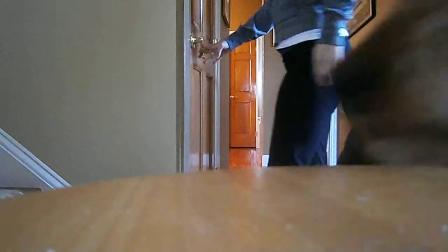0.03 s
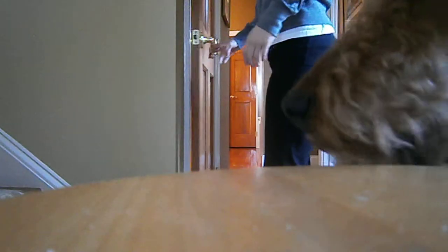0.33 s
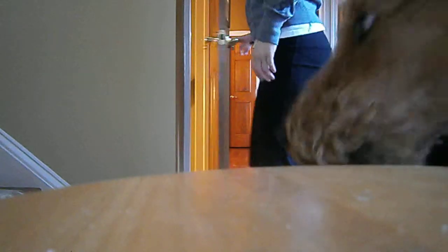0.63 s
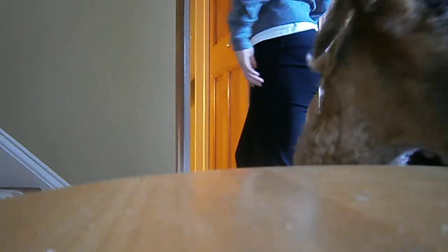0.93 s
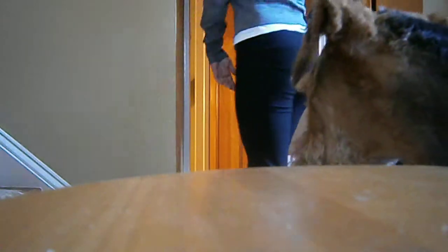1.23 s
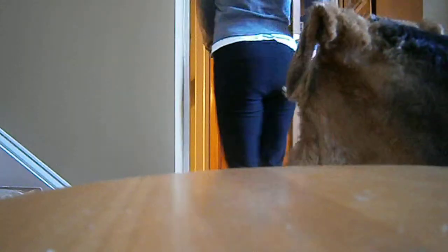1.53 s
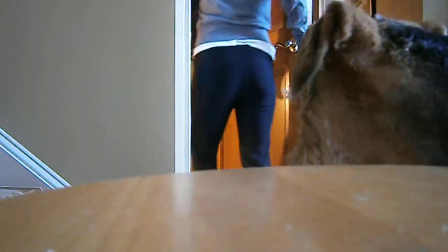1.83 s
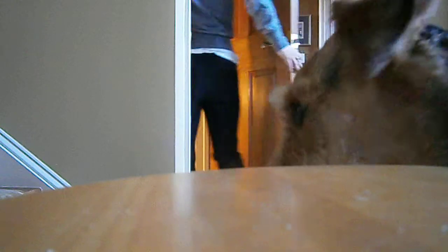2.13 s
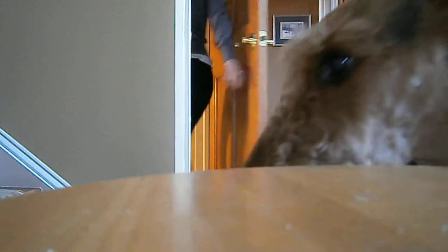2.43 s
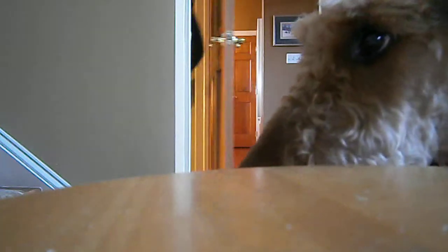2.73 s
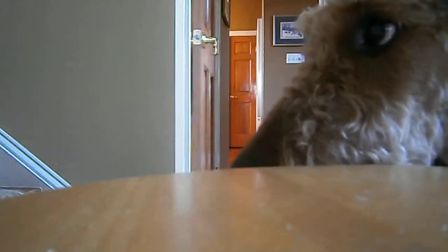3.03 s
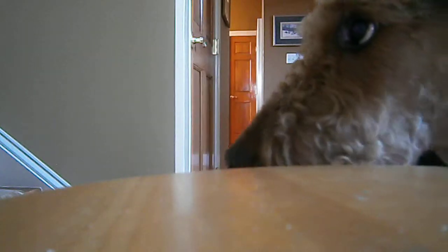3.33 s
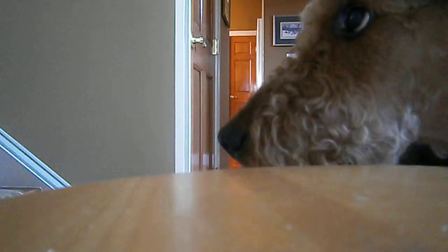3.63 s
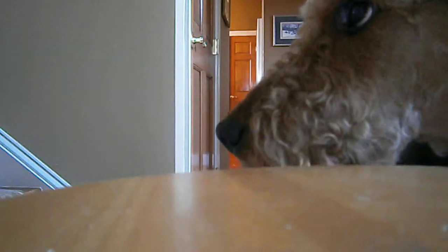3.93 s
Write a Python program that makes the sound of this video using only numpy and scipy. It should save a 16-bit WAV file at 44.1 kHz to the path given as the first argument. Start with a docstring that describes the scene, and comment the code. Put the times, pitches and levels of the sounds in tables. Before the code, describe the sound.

A door closes with a loud double bang after light knocks and a thin squeak.

```python
"""In a quiet, hard-walled hallway a door handle clacks and a thin squeak rises. Amid soft footfalls the door
knocks against its frame, each impact exciting the modes of the wood. At about 3 s another door is pulled shut
with a double bang (latch, then frame) and a low thud, overloading a small microphone that passes little above 4
kHz. Last, the steel latch clicks twice."""
import sys
import numpy as np
from scipy import signal
from scipy.fft import rfft, irfft, next_fast_len
from scipy.io import wavfile
from scipy.ndimage import map_coordinates

SR = 44100
rng = np.random.default_rng(int(sys.argv[2]) if len(sys.argv) > 2 else 0)


def waveform_to_disk(signal):
    """Save audio, clipped to [-1, 1], as 16-bit WAV at the path in sys.argv[1]."""
    frames = np.transpose(np.atleast_2d(signal))
    scaled = np.clip(frames, -1, 1) * 32767
    samples = np.round(scaled).astype(np.int16)
    wavfile.write(sys.argv[1], SR, samples)


N = 176400
T = np.arange(SR) / SR  # the one second that each impact lasts


def amp(db):
    """Decibels to amplitude ratio."""
    return 10 ** (np.asarray(db) / 20)


def along(points, hz):
    """Interpolation of (Hz, value) points on a logarithmic frequency axis."""
    freqs, values = np.transpose(points)
    return np.interp(np.log(hz + 1), np.log(freqs + 1), values)


def fade(t, t60):
    """Exponential damping: 60 dB in t60 seconds."""
    return np.exp(-np.log(1000) * t / t60)


def rise(attack_s):
    """First-order onset with time constant attack_s."""
    return 1 - np.exp(-T / attack_s)


def filtered(x, gain):
    """Zero-phase filtering: the spectrum is multiplied by gain(hz)."""
    size = next_fast_len(len(x) + 8192)
    return irfft(rfft(x, size) * gain(np.fft.rfftfreq(size, 1 / SR)), size)[:len(x)]


def noise(spectrum, size=len(T)):
    """Spectrally shaped Gaussian noise below 5 kHz, at rms 1."""
    x = filtered(rng.standard_normal(size), lambda hz: amp(along(spectrum, hz)) * (hz < 5000))
    return x / np.sqrt(np.mean(x ** 2) + 1e-20)


def wobble(rate):
    """Smooth random modulation, rate knots a second."""
    knots = rng.standard_normal(int(N * rate / SR) + 4)
    return map_coordinates(knots, [np.arange(N) * rate / SR])


def add(out, start_s, x):
    """Superposition of x on out; a sound begun before time zero leaves only its tail."""
    i = round(start_s * SR)
    x, i = x[max(-i, 0):], max(i, 0)
    out[i:i + len(x)] += x[:N - i]


def free_vibration(modes):
    """Modal superposition: damped sinusoids that start together."""
    return sum(amp(db) * fade(T, t60) * np.sin(2 * np.pi * hz * T) for hz, db, t60 in modes)


def wood_impacts(impacts, spectrum, modes, modes_db, attack_s, early_db, late_db):
    """Impact excitation: overlapping modes die quickly as noise while a few panel modes ring on."""
    out = np.zeros(N)
    onset = rise(attack_s)
    for start_s, level_db, bass_db, treble_db, t60 in impacts:
        dense = hall(noise(spectrum) * fade(T, t60) * onset, early_db, late_db)
        ring = sum(amp(db + rng.normal(0, 0.9)) * fade(T, mode_t60)
                   * np.sin(2 * np.pi * (hz * T + rng.random())) for hz, db, mode_t60 in modes)
        blow = dense + amp(modes_db) * ring * onset
        tilt = [(450, bass_db), (1800, 0.023), (3400, treble_db)]
        add(out, start_s, amp(level_db) * filtered(blow, lambda hz: amp(along(tilt, hz))))
    return out


# Impacts of a second door slamming shut: start_s, level_db, bass_db, treble_db, t60_s
BANGS = [(3.081, -13.5, 1, 3, 0.11), (3.087, -8, 0.5, 1, 0.073), (3.168, -4.5, 0, 1, 0.11),
         (3.178, -7, 1.5, -7.5, 0.12), (3.190, -4.5, -6, -0.5, 0.063)]
# Dense ring of the slammed door's wood: frequency_hz, density_db
BANG_SPECTRUM = [(50, -9), (110, -12), (170, -6.5), (240, -8), (330, 0), (520, 1), (800, 0.5), (1150, 1),
                 (1900, -4), (2800, -1.5), (3700, 0), (4200, -6)]
# Panel resonances of the second, slammed door: frequency_hz, level_db, t60_s
BANG_MODES = [(254, -12.5, 1), (332.4, -6.5, 0.65), (414, 2, 0.26), (446, -3.5, 0.6), (534, -10, 0.88),
              (656, 3, .55), (1015, -1.5, 0.41), (1175, -5.5, 0.81), (1179.4, -8.5, 1), (1617, -15.5, 0.63),
              (2150, -14.5, .3), (3178, -3.5, 0.45), (3530, 7.5, 0.22), (4020, -10, .3)]


def door_bangs():
    """Hard impacts on latch, then frame, set the door panel into free vibration."""
    return wood_impacts(BANGS, BANG_SPECTRUM, BANG_MODES,
                        modes_db=-21.5, attack_s=0.0015, early_db=-1.5, late_db=-7.5)


# Low modes of the shut door and the air it pushes: frequency_hz, level_db, t60_s
THUD_MODES = [(33.7, -17.5, 0.21), (58, -21.5, 0.72), (91.6, -24.5, 1)]
# Rumble of walls and floor: frequency_hz, density_db
RUMBLE_SPECTRUM = [(20, -19), (45, 7), (95, -7.5), (130, -6.5), (300, -19.5), (1000, -72)]


def slam_thud(start_s, attack_s, rumble_db, rumble_t60):
    """Mechanical coupling: the slam shakes the door, the air of the hall and the walls."""
    out = np.zeros(N)
    walls = amp(rumble_db) * noise(RUMBLE_SPECTRUM) * fade(T, rumble_t60)
    add(out, start_s, rise(attack_s) * (free_vibration(THUD_MODES) + walls))
    return out


# Lighter impacts of door, handle and frame: start_s, level_db, bass_db, treble_db, t60_s
KNOCKS = [(-.11, -27, 3.5, 2, 0.15), (.059, -23.5, -7, 3, 0.16), (.508, -29, 1.5, -3.5, .11),
          (.522, -32, 2, -4.5, 0.17), (1.485, -15, -17.5, -8.5, 0.025), (1.499, -25, -11.5, 10, 0.022),
          (1.746, -16, -5.5, -3.5, 0.054), (1.760, -18, 0.5, 6.5, 0.017), (3.565, -32, 0.5, -3, 0.25)]
# Dense ring of the knocking door's wood: frequency_hz, density_db
KNOCK_SPECTRUM = [(40, -33), (130, -15.5), (250, -0.5), (450, -3.5), (800, 0), (1400, -4), (1900, -4),
                  (2400, -3), (3500, 0), (4200, -8.5)]
# Panel resonances of the knocking door: frequency_hz, level_db, t60_s
KNOCK_MODES = [(286, -5.5, 0.083), (440.7, -4.5, 0.34), (609, -0.5, 0.29), (759, -10.5, 0.35),
               (924, -8, 0.37), (1071.7, -6.5, 0.65), (1241, -12, 0.42), (1903, -4, 0.18), (1965, 2.5, 0.1),
               (3100, -12, 0.11), (3440, -4, .14)]


def door_knocks():
    """Light, abrupt impacts excite the damped modes of the wood."""
    return wood_impacts(KNOCKS, KNOCK_SPECTRUM, KNOCK_MODES,
                        modes_db=-13.5, attack_s=0.00041, early_db=1.5, late_db=-4.5)


# Metal contacts of handle and latch: start_s, level_db
CLICKS = [(.0678, -15), (.0698, -5), (0.0745, -14.5), (.261, -30.5), (3.561, -15), (3.574, -11.5),
          (3.576, -11), (3.8725, -10.5), (3.874, -22.5), (3.8735, -9), (3.8904, -21)]
# Crack of each contact: frequency_hz, density_db
CRACK_SPECTRUM = [(200, -26), (1000, -16), (2000, -13.5), (2800, -2.5), (3600, -2), (4300, -3.5)]
# Resonances of the steel bolt and strike plate: frequency_hz, level_db, t60_s
BOLT_MODES = [(3080, -25.5, 0.009), (3343, 3, 0.0046), (3770, 3.5, 0.0072), (4210, -4, 0.0038)]


def latch_clicks(crack_db, crack_t60, attack_s):
    """Impulse response of the sprung bolt: heavily damped metal modes and a small crack."""
    out = np.zeros(N)
    ring = free_vibration(BOLT_MODES)
    for start_s, level_db in CLICKS:
        crack = amp(crack_db) * noise(CRACK_SPECTRUM) * fade(T, crack_t60)
        snap = (ring + crack) * rise(attack_s)
        add(out, start_s, amp(level_db) * hall(snap, early_db=-11, late_db=-19))
    return out


# Glide of the squeak: time_s, pitch_hz
SQUEAK_PITCH = [(.295, 1850), (.315, 1903), (.34, 2076), (.40, 2250), (.445, 2370), (.468, 2510),
                (.52, 2648), (.61, 2759), (.645, 2696), (.70, 2715), (.765, 2778)]
# Envelope of the squeak: time_s, level_db
SQUEAK_LEVEL = [(.28, -65), (.305, -40.5), (.34, -41.5), (.445, -43), (.468, -24.5), (.495, -37.5),
                (.525, -26), (.57, -35.5), (.63, -25), (.755, -19), (.775, -44), (.80, -59)]
# Second harmonic, lost as the pitch climbs: pitch_hz, level_db
SQUEAK_OCTAVE = [(1850, -4.5), (2000, 0), (2150, -38.5)]


def squeak(waver, rough_db):
    """Frequency and amplitude modulation: a thin tone, as of a hinge, climbs unsteadily and settles."""
    t = np.arange(N) / SR
    pitch_hz = np.interp(t, *np.transpose(SQUEAK_PITCH))
    unsteady = np.interp(t, [.55, .66], [1, .1])
    phase = 2 * np.pi * np.cumsum(pitch_hz * (1 + unsteady * waver * wobble(200))) / SR
    tone = np.sin(phase) + amp(along(SQUEAK_OCTAVE, pitch_hz)) * np.sin(2 * phase)
    level_db = np.interp(t, *np.transpose(SQUEAK_LEVEL), left=-120, right=-120)
    flutter_db = unsteady * rough_db * wobble(110)
    return hall(amp(level_db + flutter_db) * tone, early_db=-6, late_db=-13)


# Steps of a person walking off: start_s, level_db
STEPS = [(.86, -42.5), (1.251, -58.5), (2.329, -55), (2.471, -47)]
# Dull pad of a foot: frequency_hz, density_db
STEP_SPECTRUM = [(40, -16), (140, -2), (300, -3), (700, -11), (1500, -29), (4000, -47)]


def footfalls(attack_s, t60):
    """Cushioned impact: a soft foot loads the floor slowly, exciting mainly low frequencies."""
    out = np.zeros(N)
    for start_s, level_db in STEPS:
        add(out, start_s, amp(level_db) * noise(STEP_SPECTRUM) * rise(attack_s) * fade(T, t60))
    return out


# Reverberation time of the hallway: frequency_hz, t60_s
HALL_T60 = [(100, 0.3), (300, 1.3), (600, 1.38), (900, 1.48), (1400, 1.14), (2200, 0.91), (2800, 0.93),
            (3800, 0.83)]


def hall(x, early_db, late_db):
    """Reverberation by convolution: dense near-wall reflections and the stairwell's longer ring."""
    hz, t, spectra = signal.stft(rng.standard_normal(len(T)), SR, nperseg=256)
    damped = spectra * fade(t, along(HALL_T60, hz)[:, None])
    late = signal.istft(damped, SR, nperseg=256)[1][:len(T)]
    early = rng.standard_normal(len(T)) * fade(T, t60=0.32)
    echoes = amp(early_db) * early / np.linalg.norm(early) + amp(late_db) * late / np.linalg.norm(late)
    build_up = 1 - np.exp(-(T / 0.002) ** 2)
    return x + signal.fftconvolve(x, build_up * echoes)[:len(x)]


# Background noise of the room: frequency_hz, density_db
HISS_SPECTRUM = [(20, -2), (45, -11.5), (70, -1.5), (130, 0.5), (240, 1), (500, -3), (750, -6), (1200, -10),
                 (2000, -11), (3800, -10.5), (4400, -20)]


def room_hiss(level_db):
    """Stationary broadband noise forms the floor of the quiet hallway."""
    return amp(level_db) * noise(HISS_SPECTRUM, N)


def scene():
    """Linear superposition of all sources in one channel."""
    knocks = door_knocks()
    bangs = door_bangs()
    thud = slam_thud(start_s=3.177, attack_s=0.014, rumble_db=-22, rumble_t60=0.84)
    clicks = latch_clicks(crack_db=-9.5, crack_t60=0.026, attack_s=0.00034)
    background = room_hiss(level_db=-47.5) + footfalls(attack_s=0.0088, t60=0.376)
    return (bangs + thud + knocks + clicks + squeak(waver=.012, rough_db=4.0) + background)[None]


# Frequency response of the microphone path: frequency_hz, gain_db
MIC_RESPONSE = [(3800, 0), (4050, -4.5), (4280, -8.5), (4450, -26.5), (4650, -44), (5200, -100)]


def record(dry):
    """Band limiting and saturation: the narrow-band microphone path overloads on the loudest bang."""
    heard = filtered(dry[0], lambda hz: amp(along(MIC_RESPONSE, hz)))
    saturated = np.clip(heard, -0.66, 0.66)
    return filtered(saturated, lambda hz: hz < 16000)[None]


dry = scene()
out = record(dry)
waveform_to_disk(out)
```